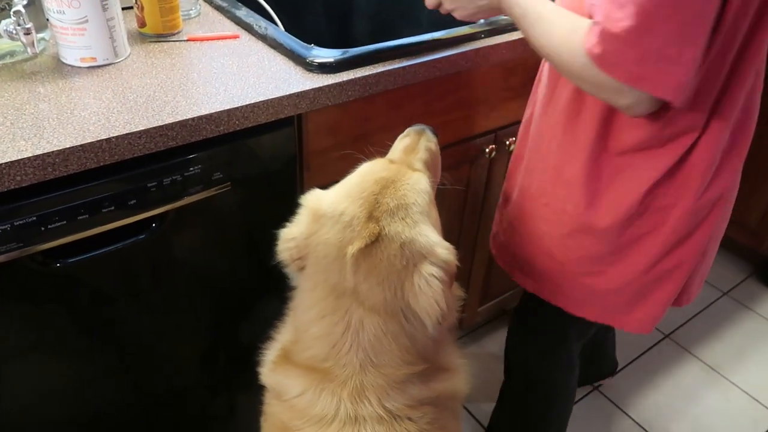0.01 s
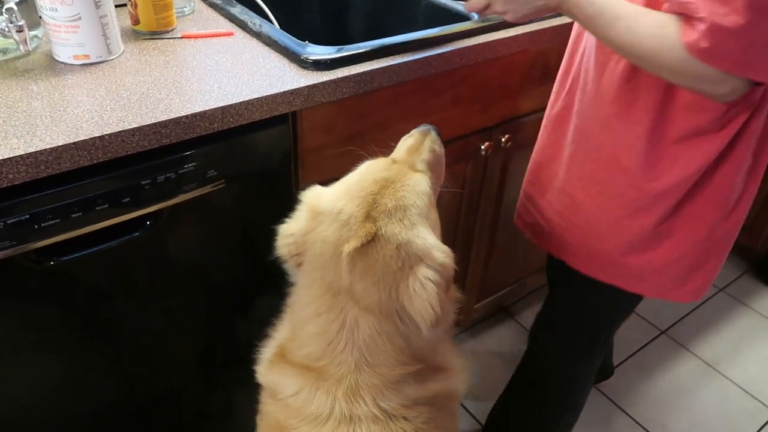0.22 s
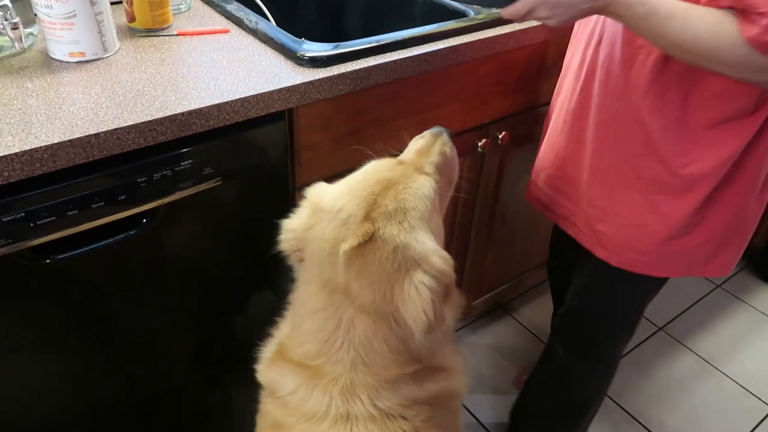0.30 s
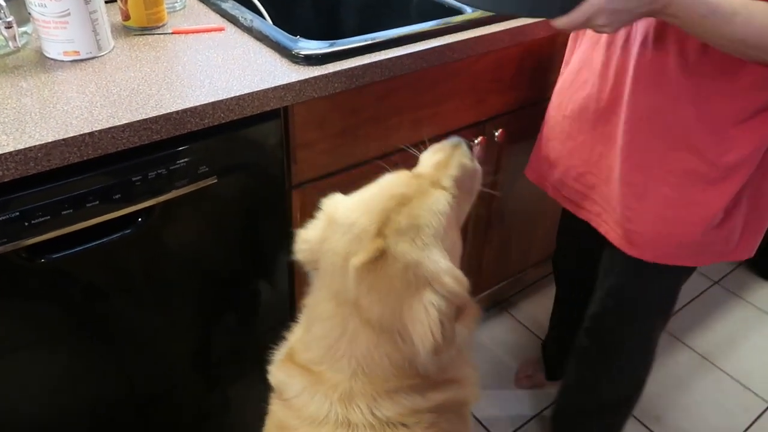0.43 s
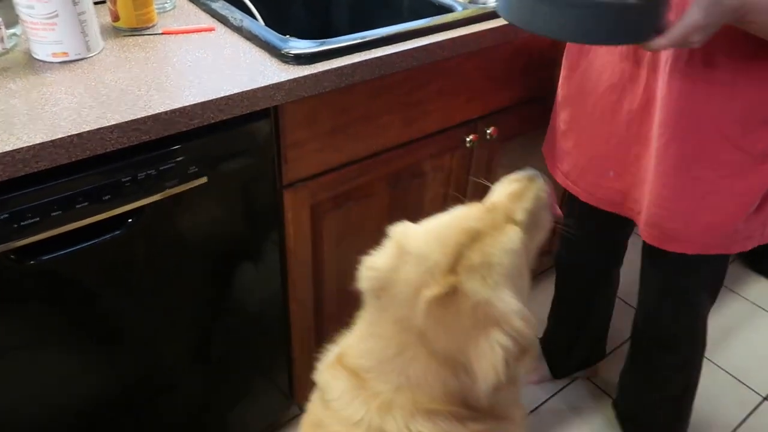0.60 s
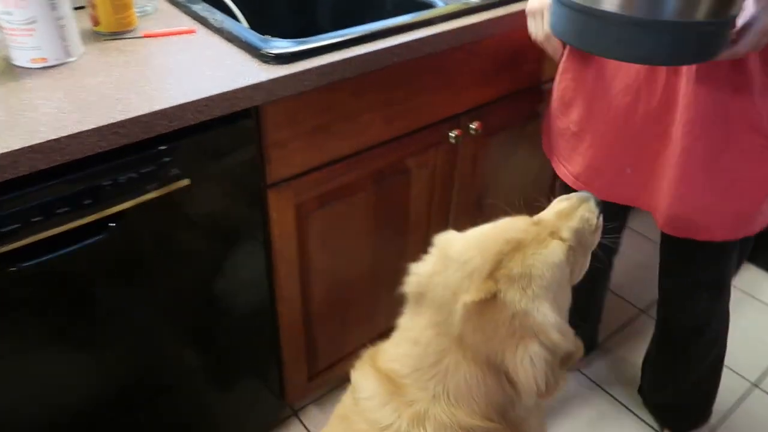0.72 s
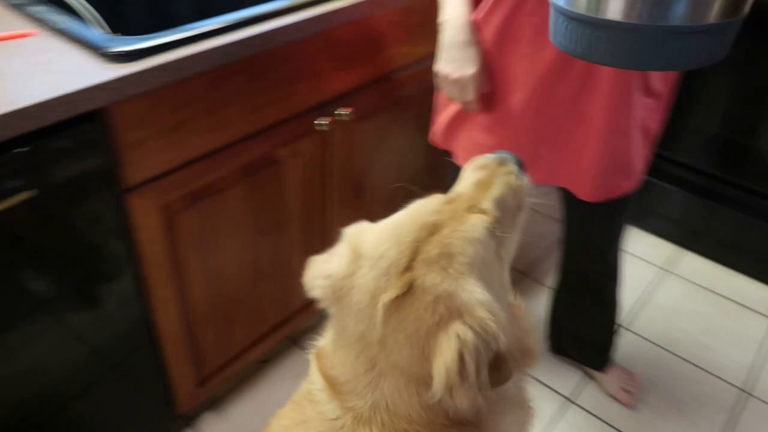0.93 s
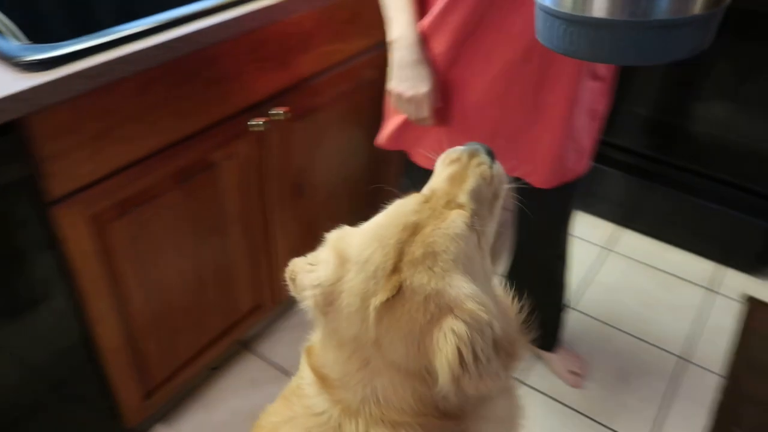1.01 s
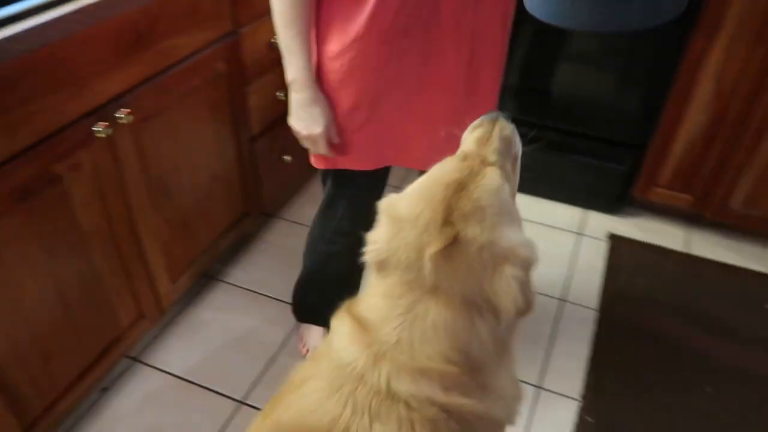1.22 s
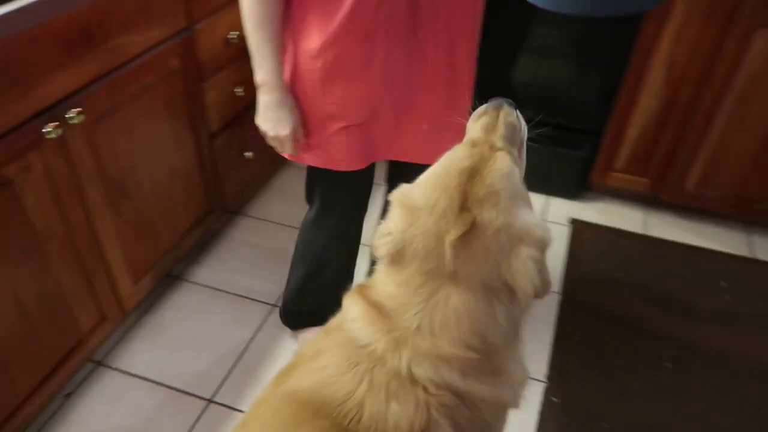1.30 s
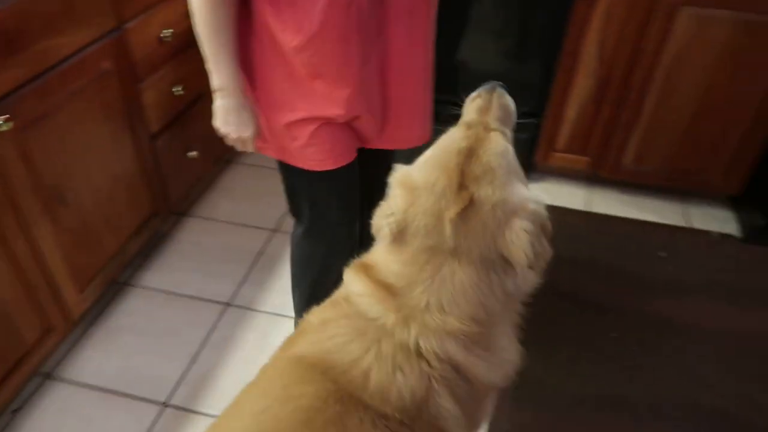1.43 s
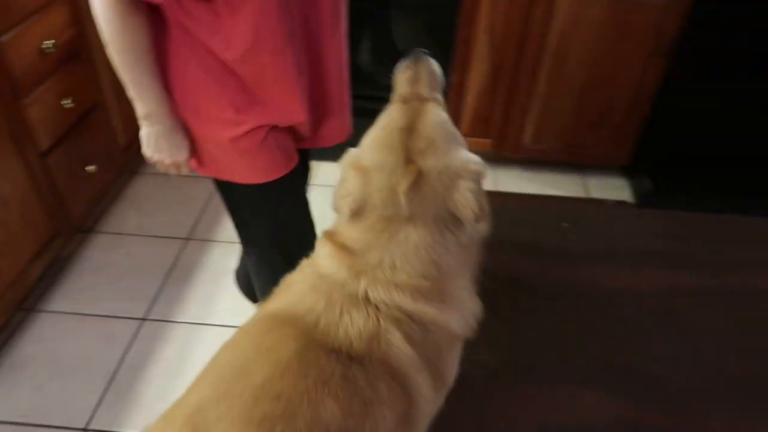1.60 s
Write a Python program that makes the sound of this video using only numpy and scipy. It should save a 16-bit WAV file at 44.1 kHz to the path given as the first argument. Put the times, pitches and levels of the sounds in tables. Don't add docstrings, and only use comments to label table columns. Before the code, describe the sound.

A steel bowl bangs twice on a metal sink, dull and clattery with small bounces, then quiet scuffs, squeaks and claw taps on kitchen tiles over a faint room hum, heard by a small camera.

```python
import sys
import numpy as np
from scipy import signal
from scipy.fft import rfft, irfft, next_fast_len
from scipy.io import wavfile
from scipy.ndimage import map_coordinates

SR = 44100
rng = np.random.default_rng(int(sys.argv[2]) if len(sys.argv) > 2 else 0)


def wav_out(sig):
    wavfile.write(sys.argv[1], SR, np.round(np.clip(np.atleast_2d(sig).T, -1, 1) * 32767).astype(np.int16))


def gain_from_db(level_db):
    decades = np.asarray(level_db, float) / 20
    return 10 ** decades


N = 74970


def unit(x):
    return x / np.sqrt(np.mean(x ** 2) + 1e-20)


def along(points, hz):
    f, value = np.transpose(points)
    return np.interp(np.log(hz + 1), np.log(f + 1), value)


def filtered(x, response):
    n = x.shape[-1]
    m = next_fast_len(n + 8192)
    spectrum = rfft(x, m) * response(np.fft.rfftfreq(m, 1 / SR))
    return irfft(spectrum, m)[..., :n]


def wobble(rate, size):
    knots = rng.standard_normal(int(size * rate / SR) + 4)
    return map_coordinates(knots, [np.arange(size) * rate / SR])


def add(track, s, sound):
    k = round(s * SR)
    track[:, k:k + sound.shape[1]] += sound[:, :N - k]


def dying(t60s, colour, size):
    hz, t, z = signal.stft(rng.standard_normal((2, size)), SR, nperseg=128)
    decay = gain_from_db(-60 * t / along(t60s, hz)[:, None])
    gain = colour(hz)[:, None] * decay
    z = z * gain / np.sqrt(np.mean(colour(hz) ** 2))
    return signal.istft(z, SR, nperseg=128)[1][:, :size]


# f/Hz, level/dB [per Hz]
MURMUR_SPECTRUM = [(25, -11), (50, 5.5), (80, -3.5), (200, 3), (500, -6), (1500, -14.5), (5000, -27),
                   (11000, -37), (14000, -42), (15000, -70)]
# t/s, level/dB
MURMUR_LEVEL = [(0, -46.5), (.6, -46), (1.7, -44.5)]
# f/Hz, level/dB, unsteadiness/Hz
FRIDGE_LINES = [(50, -79, 10), (117.8, -49.5, 7.8), (194.8, -53, 11.3)]


def room_tone():
    t = np.arange(N) / SR
    murmur = unit(filtered(rng.standard_normal((2, N)), lambda hz: gain_from_db(along(MURMUR_SPECTRUM, hz))))
    level_db = np.interp(t, *np.transpose(MURMUR_LEVEL)) + 0.83 * wobble(13.5, size=N)
    out = murmur * gain_from_db(level_db)
    for hz, db, drift in FRIDGE_LINES:
        strength = gain_from_db(db + 0.94 * wobble(drift, size=N))
        phase = 2 * np.pi * hz * t + 0.3 * wobble(drift, size=N)
        out = out + strength * np.sin(phase)
    return out


def rub(strokes, octaves):
    grit_db, bands_db, top_hz = 0.5, 2.5, 10500
    out, t = np.zeros((2, N)), np.arange(SR // 2) / SR
    for s, rise, t60, db, centre_hz in strokes:
        grit = rng.standard_normal((2, len(t))) * gain_from_db(grit_db * wobble(613.0, size=len(t)))

        def colour(f):
            bands = gain_from_db(bands_db * wobble(389.7, size=len(f))) / np.sqrt(1 + (f / top_hz) ** 6)
            return bands * np.exp(-0.5 * (np.log2((f + 1) / centre_hz) / octaves) ** 2)

        envelope = np.minimum(t / rise, 1) * gain_from_db(db - 60 * np.maximum(t - rise, 0) / t60)
        add(out, s, unit(filtered(grit, colour)) * envelope)
    return out


# t/s, rise/s, t60/s, level/dB,
# centre f/Hz
SQUEAKS = [(.05, 0.059, 0.31, -48, 302), (.33, 0.016, 0.1, -50.5, 3280), (.403, 0.0011, 0.054, -23.5, 3210),
           (.51, 0.0036, 0.22, -34, 484), (.7, 0.011, 0.14, -41.5, 636), (.94, 0.015, 0.23, -52, 1480),
           (.94, 0.026, 0.49, -48.5, 328), (1.067, 0.0055, 0.081, -44, 1500),
           (1.315, 0.013, 0.13, -46, 1650), (1.01, .008, 0.22, -49.5, 2060), (1.35, 0.032, 0.47, -57, 2500),
           (.83, .01, 0.22, -48, 880), (1.068, 0.0094, 0.18, -38, 1330), (1.446, 0.012, 0.12, -44.5, 1206),
           (1.6, 0.016, 0.31, -53, 2520), (1.64, 0.0055, 0.46, -51.5, 2060), (.51, 0.012, 0.35, -45, 910),
           (1.094, 0.0022, 0.083, -38.5, 6150)]


def squeaks():
    return rub(SQUEAKS, octaves=0.098)


# t/s, peak level/dB, f/Hz, t60/s
TAPS = [(.0762, -52, 2080, 0.017), (.182, -40.5, 867, 0.061), (0.353, -43, 5470, 0.0089),
        (.509, -36.5, 5150, 0.087), (.509, -40, 4500, 0.097), (.6925, -36, 4400, 0.049),
        (.6935, -34, 1710, 0.049), (0.8737, -46, 3220, .015), (.9105, -43, 3040, 0.015),
        (0.911, -47, 5530, 0.015), (1.074, -37, 1403, 0.064), (1.0945, -27.5, 2540, 0.015),
        (1.0965, -37, 3740, .02), (1.098, -32.5, 940, 0.045), (1.5565, -38, 670, 0.011),
        (1.572, -36, 290, 0.02), (.14, -37, 130, 0.24), (.6065, -50, 2320, .02), (1.33, -38.5, 940, 0.086),
        (1.3985, -29, 600, 0.02), (1.553, -39.5, 765.6, 0.21), (1.556, -39.5, 342, 0.092)]


def taps():
    out, t = np.zeros((2, N)), np.arange(SR // 4) / SR
    for s, db, hz, t60 in TAPS:
        click = hz / 12000 * gain_from_db(-60 * t / 0.0038) * rng.standard_normal(len(t))
        mode = gain_from_db(-60 * t / t60) * np.sin(2 * np.pi * hz * t)
        add(out, s, gain_from_db(db) * (mode + click) * [[1], [0.6]])
    return out


# t/s, rise/s, t60/s, level/dB, centre f/Hz
SCUFFS = [(0.169, 0.094, 0.53, -46, 650), (.242, 0.0051, 0.26, -42, 7600), (0.26, 0.042, 0.13, -55, 3180),
          (.39, 0.0096, 0.23, -33, 1600), (.506, 0.0025, 0.7, -48, 2900), (1.065, 0.041, 0.23, -37, 910),
          (0.692, 0.0018, 0.27, -35, 2150), (0.76, 0.0022, .12, -45, 900),
          (.7055, 0.00092, 0.067, -34, 4100), (.242, .003, 0.053, -49, 19000),
          (1.115, .004, 0.063, -38, 1500), (1.53, .02, 0.27, -41.5, 145),
          (.716, 0.0021, 0.091, -34.5, 1640), (0.53, 0.03, 0.25, -49.5, 650), (1.32, .02, 0.34, -54, 1900),
          (.385, .015, .1, -37, 930), (1.005, 0.012, 0.31, -45.5, 2150), (1.4, 0.0037, 0.94, -49.5, 1600),
          (1.093, 0.00058, 0.28, -37.5, 3000), (1.11, 0.054, 0.34, -40, 660),
          (1.199, 0.022, 0.48, -52, 5400), (1.3, 0.042, 0.31, -42.5, 630), (1.444, 0.025, 0.14, -43, 1970),
          (1.54, 0.015, 0.22, -40, 490), (1.601, 0.023, 1, -50, 4700), (.4035, 0.0011, 0.035, -33, 3300)]


def scuffs():
    return rub(SCUFFS, octaves=1.2)


def ring(modes, s, t, scatter_db, rough, rate):
    hz, db, t60 = np.transpose(modes)[:, :, None]
    place = t * rate
    k = place.astype(int)
    knots = rng.standard_normal((2, len(modes), SR // 100))
    shake = rough * (knots[..., k] + (place - k) * (knots[..., k + 1] - knots[..., k]))
    onset = 1 - np.exp(-t / 0.0013)
    decay = gain_from_db(db + scatter_db * rng.standard_normal(hz.shape) - 60 * t / t60)
    size = decay * (1 + shake[0]) * onset
    turn = 2 * np.pi * hz * (s + t) + shake[1]
    side_turn = turn + 2 * np.pi * rng.random(hz.shape)
    mid = (size * np.sin(turn)).sum(axis=0)
    side = 0.13 * (size * np.sin(side_turn)).sum(axis=0)
    return np.array([mid, side])


# f/Hz, level/dB [per Hz]
CLATTER_SPECTRUM = [(150, -14), (474, -6), (729, 0), (1060, -5.5), (2390, -7.5), (4500, -14.5), (8000, -35),
                    (13000, -52)]
# f/Hz, t60/s
CLATTER_DECAY = [(200, 0.45), (800, 0.15), (3000, 0.074), (10000, 0.081)]


def clatter(t):
    noise = dying(CLATTER_DECAY, lambda hz: gain_from_db(along(CLATTER_SPECTRUM, hz)), len(t))
    return noise * (1 - np.exp(-t / 0.00091))


# f/Hz, level/dB, t60/s
BASIN_RIM = [(154.75, -10, 0.19), (279.2, -1, 0.12), (305, -12, 0.23), (350.4, -6, 0.15),
             (537, -14.5, 0.14), (600, -14.5, 0.12), (713, -0.5, 0.067), (823, -10.5, 0.3),
             (922.7, -2, 0.073), (1096, -10.5, 0.041), (1360, -22, 0.2), (1509, -19, 0.1),
             (1755, -23, 0.24), (1980, -33, 0.53)]
# f/Hz, level/dB, t60/s
BASIN_WALL = [(203, -17.5, 0.24), (270.4, -6, 0.092), (382, -8, 0.21), (484, -17.5, 0.13), (602, -1, 0.073),
              (720, 0.5, 0.19), (822, -8.5, 0.23), (880, -13.5, 0.14), (923.3, -1, 0.13),
              (1090, -4.5, 0.052), (1322, -9, 0.062), (1509, -13, 0.097), (1800, -13, 0.25),
              (1911, -12, 0.15)]
# f/Hz, level/dB, t60/s
BASIN_BOUNCE = [(280.6, 0.5, 0.082), (357, -6, .15), (490.8, -9, 0.12), (600, -8.5, 0.17),
                (715.4, -3.5, 0.17), (825, -7, 0.17), (2143, -15, 0.096)]
# f/Hz, level/dB, t60/s
BASIN_SETTLE = [(272, -3, 0.17), (355, 1.5, 0.17), (452, -4.5, 0.19), (569, -3, 0.19), (720, -20.5, 0.21),
                (818, -10, 0.23), (953, -4, 0.17), (1100, -14, 0.27), (1840, -15, 0.17)]


def basin_thud(spot, s, t):
    modes = (BASIN_RIM, BASIN_WALL, BASIN_BOUNCE, BASIN_SETTLE)[round(spot)]
    return ring(modes, s, t, scatter_db=1.9, rough=0.3, rate=138)


# f/Hz, level/dB, t60/s
BOWL_BY_RIM = [(2255, -6.5, 0.22), (2770, -4, .06), (3500, -7, 0.26), (4480, -4, 0.12), (5150, -17, .1),
               (6095, -6.5, 0.3), (6740, -3, 0.11), (7460, -3.5, 0.13), (9000, -30, 0.066),
               (10200, -11, 0.15), (10920, -13.5, 0.13), (11900, -9.5, 0.15), (13900, -11, 0.28),
               (15400, -24, .06)]
# f/Hz, level/dB, t60/s
BOWL_HELD_LOW = [(2220, -0.5, 0.23), (2755, 2, 0.061), (3470, -33, 0.21), (4070, -12.5, 0.32),
                 (4440, -28, 0.093), (5040, -7, 0.11), (6080, -15, 0.29), (6880, -2.5, 0.1),
                 (7480, -7.5, 0.22), (9670, -13.5, 0.2), (13200, 1, 0.06), (10850, -19, 0.18),
                 (11780, -13, 0.13), (13740, -13, 0.36)]


def bowl_ring(s, t):
    modes = BOWL_BY_RIM if s > 0.35 else BOWL_HELD_LOW
    return ring(modes, s, t, scatter_db=-0.5, rough=1.25, rate=260)


# t/s, thud level/dB, ring level/dB, clatter level/dB,
# spot [0 rim, 1 wall, 2 rocking foot, 3 settling]
CONTACTS = [(0.2418, -19.5, -37, -23, 0), (0.2467, -14.5, -36, -23, 0), (.262, -56, -40, -26, 0),
            (0.2837, -17.5, -44.5, -27.5, 2), (0.301, -28.5, -62, -34, 2), (.391, -34.5, -56, -29, 1),
            (0.4, -26, -43, -17, 1), (.405, -20.5, -38.5, -13.5, 1), (.408, -21, -51, -20.5, 1),
            (.424, -48, -54, -34, 1), (.455, -28.5, -45, -27.5, 2), (.484, -30.5, -69, -38, 2),
            (0.51, -31, -43, -33.5, 3), (.535, -39, -73, -36.5, 3), (.572, -46, -73, -50, 3)]


def knocks():
    out, t = np.zeros((2, N)), np.arange(SR // 3) / SR
    for s, thud_db, ring_db, clatter_db, spot in CONTACTS:
        add(out, s, gain_from_db(clatter_db) * clatter(t))
        add(out, s, gain_from_db(thud_db) * basin_thud(spot, s, t))
        add(out, s, gain_from_db(ring_db) * bowl_ring(s, t))
    return filtered(out, lambda hz: 1 / (1 + (156.4 / (hz + 1)) ** 6))


# f/Hz, t60/s
KITCHEN_DECAY = [(200, 0.48), (2000, 0.39), (10000, 0.22)]


def kitchen_echo(near):
    tail = dying(KITCHEN_DECAY, np.ones_like, SR // 2)
    late = np.pad(tail, ((0, 0), (300, 0))) / np.linalg.norm(tail[0])
    return gain_from_db(-12) * signal.fftconvolve(near, late, axes=1)[:, :N]


def scene():
    near = knocks() + scuffs() + squeaks() + taps()
    return near + kitchen_echo(near) + room_tone()


# f/Hz, level/dB
SIDE_WIDTH = [(40, -54), (150, -18.5), (350, -15.5), (700, -12.5), (2400, -10), (4400, -5), (8000, -4.5),
              (13500, 5)]
# f/Hz, level/dB
PORT_GAP = [(300, -69), (2000, -15), (5000, -13), (7000, -1), (9000, 2), (13000, 9.5)]


def band_limit(x):
    return signal.sosfilt(signal.butter(12, 15760, fs=SR, output="sos"), x)


def record(dry):
    mid = filtered(dry[0], lambda hz: 1 / np.sqrt(1 + (hz / 11700) ** 12) * (hz < 15700))
    leaning = dry[1] + 0.092 * dry[0]
    side = filtered(leaning, lambda hz: gain_from_db(along(SIDE_WIDTH, hz)))
    side = side + filtered(dry[0], lambda hz: 1j * gain_from_db(along(PORT_GAP, hz)))
    side = filtered(side, lambda hz: gain_from_db(-28) + 1 / (1 + (hz / 13800) ** 60))
    return band_limit(np.array([mid + side, mid - side]))


dry = scene()
out = record(dry)
wav_out(out)
```